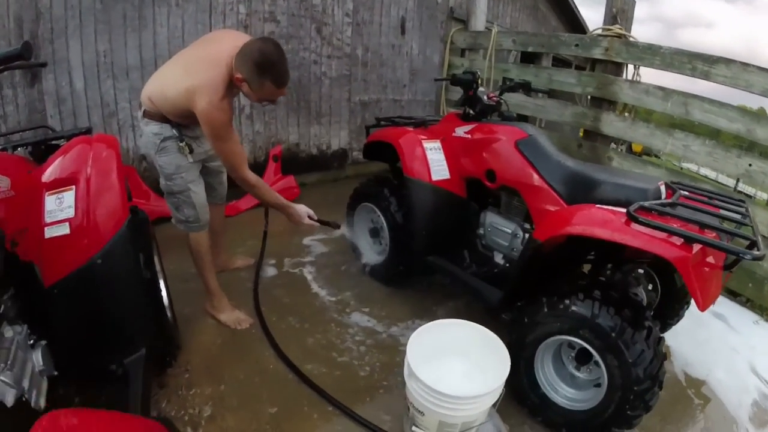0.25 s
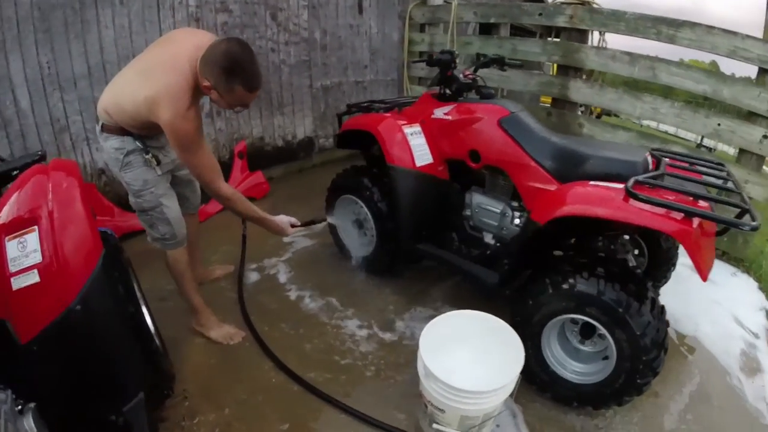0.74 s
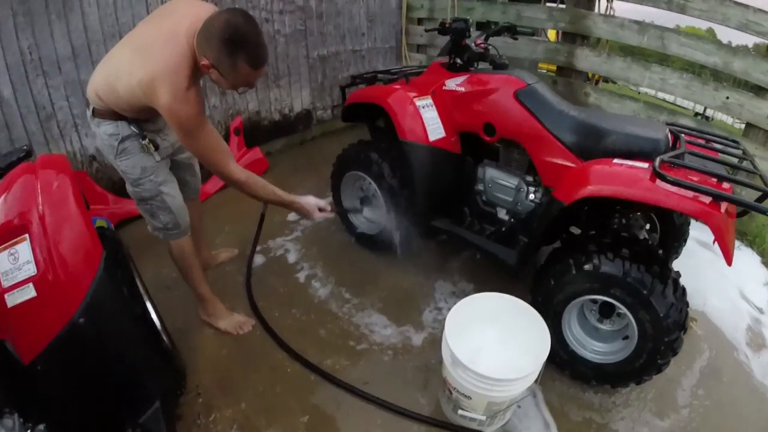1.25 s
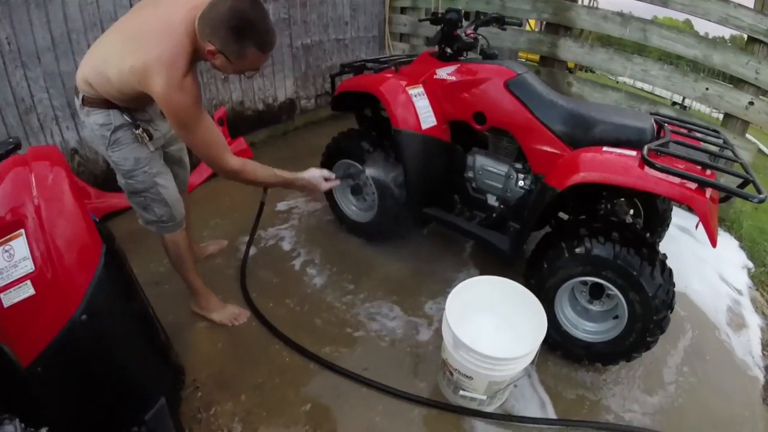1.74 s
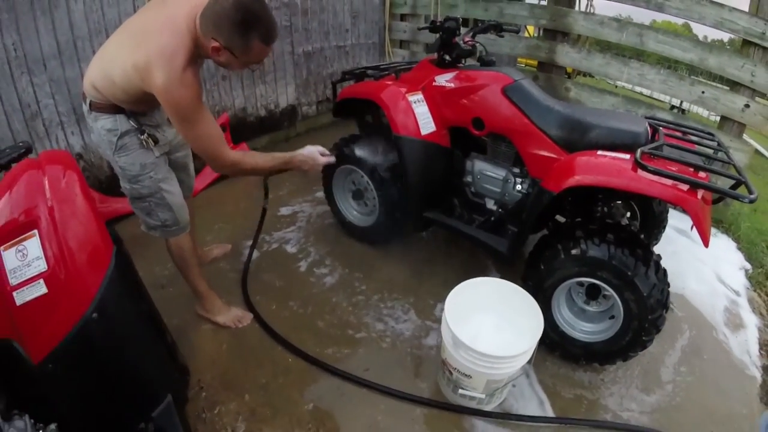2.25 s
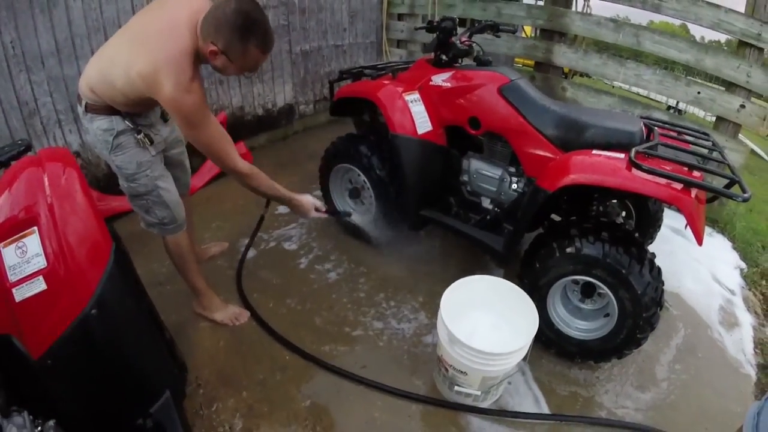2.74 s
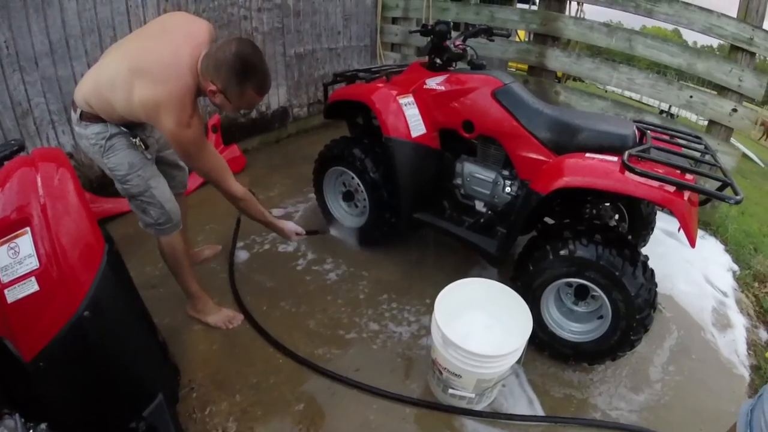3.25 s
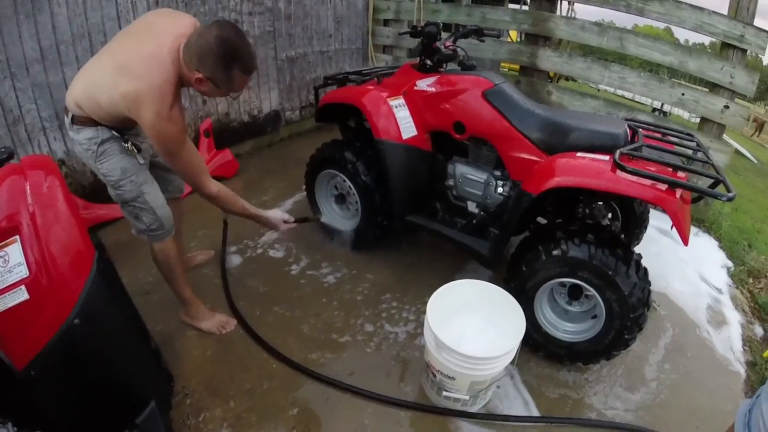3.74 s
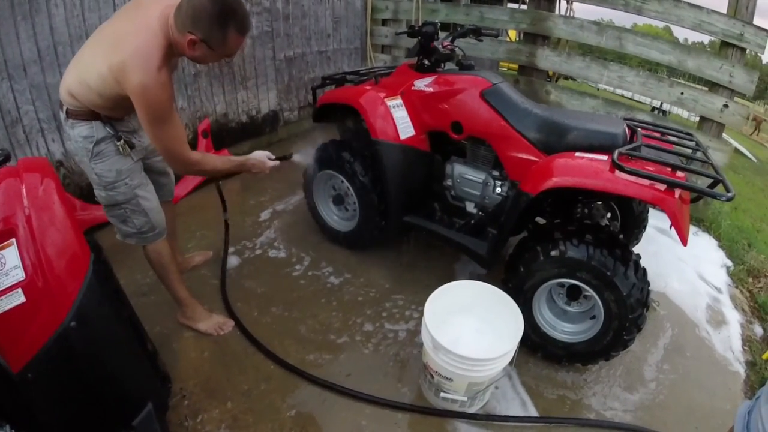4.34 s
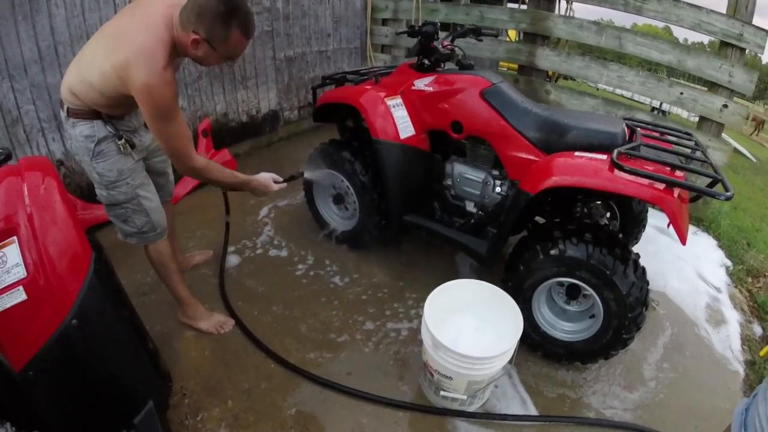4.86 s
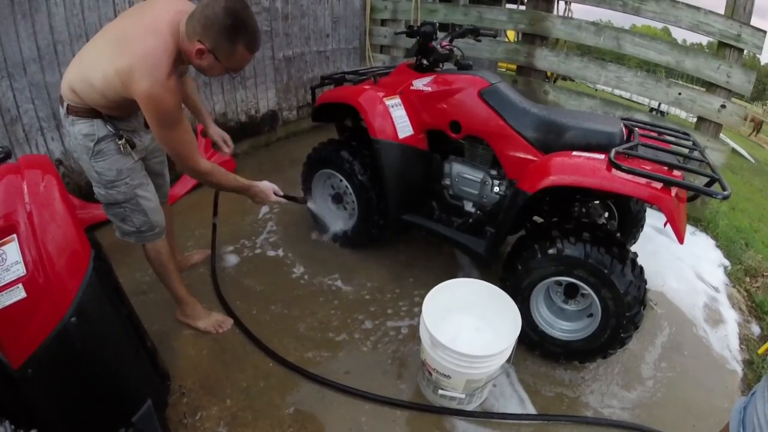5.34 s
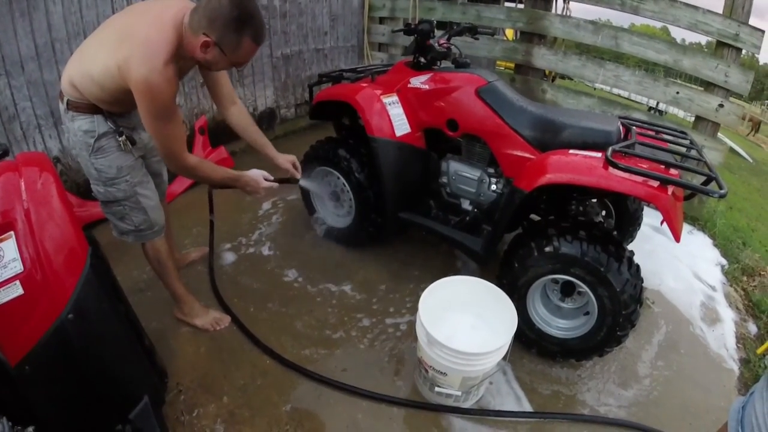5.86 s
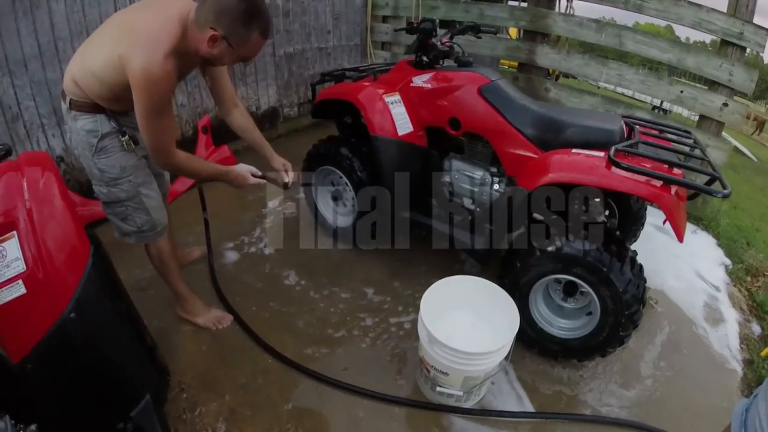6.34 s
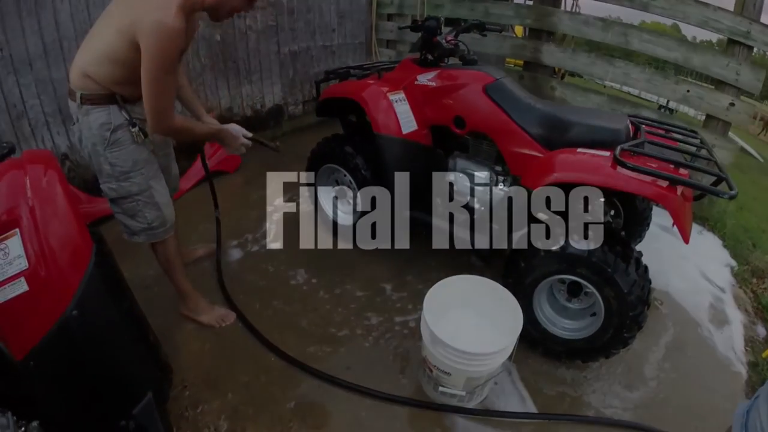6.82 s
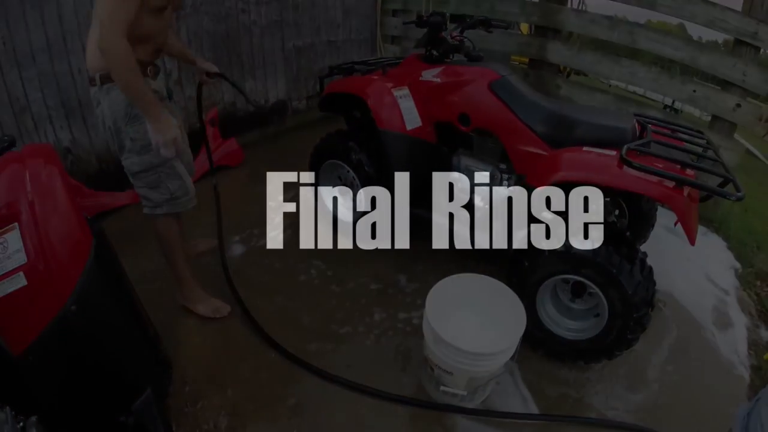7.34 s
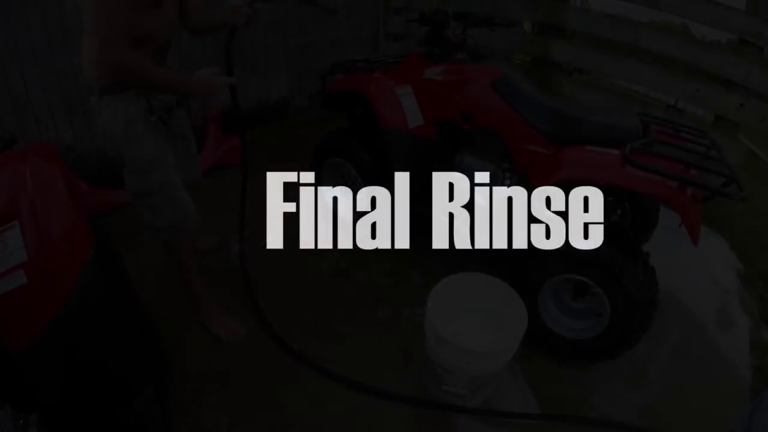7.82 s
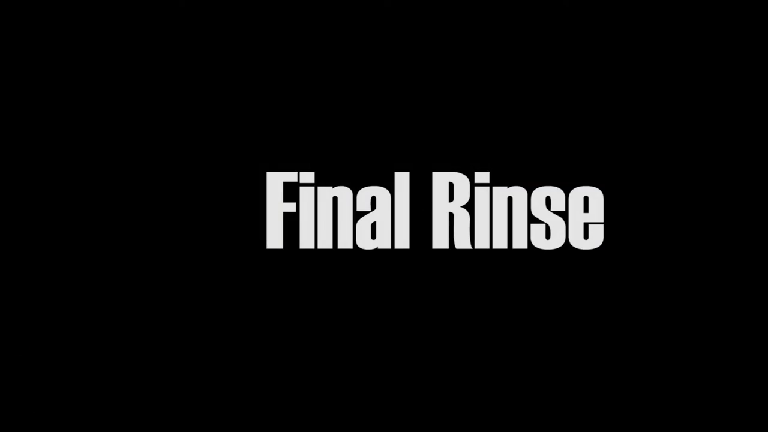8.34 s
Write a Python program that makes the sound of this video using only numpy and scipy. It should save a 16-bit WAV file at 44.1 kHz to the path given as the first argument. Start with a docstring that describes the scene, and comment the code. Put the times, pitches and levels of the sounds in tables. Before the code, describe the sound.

A strong, uneven water jet sweeps across a wheel, starting with metallic, hissing splashes on the rim, then mostly a throaty, gurgling drumming on the tyre with gushes onto a wet slab. The nozzle shuts and the spray drains in a moment. A quiet yard is left, with insects, rumble and distant engine hum; drips and ticks follow, then a bouncing clack and sudden silence. Close, centred mono pickup.

```python
"""In a yard, a garden hose plays over the wheel of a quad bike, close to one microphone.
Random impacts drum on the tyre, ring the steel rim, spatter and hiss; slugs gulp and run-off slaps the slab.
The nozzle is shut and the drumming stops at once, while the last spray drains away.
That leaves the yard: shaped-noise rumble and insects, a far engine of wavering sines, ringing drips,
short ticks, splats and knocks and a clack of the nozzle, before the sound cuts off."""
import sys
import numpy as np
from scipy import signal
from scipy.fft import rfft, irfft
from scipy.io import wavfile

SR = 44100
rng = np.random.default_rng(int(sys.argv[2]) if len(sys.argv) > 2 else 0)


def to_wav(sig):
    """Store sig (one row per channel, or 1-D mono) as 16-bit WAV at the path in sys.argv[1].

    Samples outside -1..1 are clipped; the rate is SR.
    """
    pcm = np.clip(np.atleast_2d(sig), -1, 1) * 32767
    pcm = np.round(pcm).astype(np.int16)
    wavfile.write(sys.argv[1], SR, pcm.T)  # frames by channels


N = 378378
TIME = np.arange(N) / SR
BINS = np.fft.rfftfreq(N, 1 / SR)

# the nozzle is shut; the sound has fallen to silence; the top of the band
SHUT_S, CUT_S, BAND_LIMIT_HZ = 6.292, 8.054, 15150
# once shut: the fall of the jet, then the level and fall of the water still draining
SHUT_DB_PER_S, DRAIN_DB, DRAIN_DB_PER_S = 254, -15, 100

# where the jet is aimed: t/s, share on tread and mudguard 0-1 (the rest on the wheel's face),
# force on the rubber level/dB before the common trim and the splashes
AIM = [(0, 0.14, -41.5), (.45, 0, -41), (.8, 0.5, -39), (.95, 0.6, -42), (1.27, 1, -36.5),
       (1.41, 0.2, -41.5), (1.58, 0.4, -38), (1.72, 0.9, -36.5), (1.92, 0.95, -37.5), (2.3, 0.87, -37),
       (2.65, 0.62, -35.5), (2.75, 0.1, -40), (3.14, 0.83, -43.5), (3.45, 0, -38.5), (3.68, 0.4, -40),
       (3.76, 0.9, -38), (3.8, 0.5, -41), (3.845, 0.5, -40.5), (3.868, 0.75, -35.5), (4.0, .9, -36.5),
       (4.13, 1, -36.5), (4.17, 0.8, -39), (4.28, 0.9, -39), (4.36, 0.7, -36), (4.42, 0.4, -40.5),
       (4.58, 0.25, -38), (5.15, 0.4, -38), (5.4, 0.2, -40), (5.8, 0.03, -37.5), (6.24, 0, -40.5),
       (6.31, .25, -44)]
# the jet crosses an edge of the wheel and splashes: middle t/s, length t/s,
# change of the drumming level/dB, change of the spray level/dB
SPLASHES = [(0.39, 0.067, -5, 4), (0.67, .08, 1.5, 3), (0.843, 0.12, 1.5, 0), (0.91, 0.054, 4.5, 3.5),
            (1.085, 0.071, 0.5, 1.5), (1.415, 0.12, -0.5, 3.5), (2.978, 0.36, 7, 5), (3.31, 0.26, 6.5, 3),
            (3.553, 0.12, 3.5, 4), (3.781, 0.11, 2, 6.5), (4.036, 0.064, -0.5, 1.5), (4.198, 0.098, 2, 4),
            (5.198, 0.088, -1, 6.5), (5.268, 0.12, 3, 4.5), (5.402, 0.1, 4, 4.5), (5.465, 0.072, 3, 5),
            (5.818, 0.076, -2, 4), (6.241, 0.11, 2, 3.5)]
# colour of the hollow tread under the mudguard: f/Hz, relative level/dB per Hz
TREAD_COLOUR = [(300, -38.5), (480, -23), (570, -12.5), (660, -6), (750, -9), (870, -2), (980, -6.5),
                (1100, -12), (1250, -12.5), (1450, -19), (1800, -25.5), (3000, -47)]
# colour of the wheel's face: f/Hz, relative level/dB per Hz
FACE_COLOUR = [(300, -66), (500, -11), (690, -15), (760, -9), (880, -1.5), (1020, -3.5), (1130, -7.5),
               (1300, -13), (1550, -23.5), (1900, -35), (3000, -46)]
# water sloshing in the tread: pitch, width, rms swing (octaves), speed of swing, level against the drumming
POCKET_HZ, POCKET_WIDTH_HZ, POCKET_SWING_OCT, POCKET_RATE_HZ, POCKET_DB = 823, 230, .3, 22, -6.5

# heavy slugs gulping in the hollows of the wheel: start t/s, level/dB at the crest, f/Hz at the crest
SLUGS = [(.834, -36, 853), (.957, -34.5, 871), (1.105, -36, 754), (1.191, -36, 944), (1.234, -37, 908),
         (1.458, -42, 876), (1.676, -32.5, 900), (1.83, -36.5, 847), (2.052, -41.5, 788), (2.15, -35, 804),
         (2.404, -37, 876), (2.58, -34, 950), (2.662, -34.5, 887), (2.959, -34.5, 907), (3.258, -36.5, 894),
         (3.535, -33.5, 1015), (3.862, -40.5, 892), (3.96, -36, 837), (4.057, -36.5, 886),
         (4.104, -38, 866), (4.214, -31, 850), (4.311, -33, 828), (4.461, -31.5, 917), (4.892, -36.5, 913),
         (4.963, -36, 918), (5.213, -36.5, 924), (5.265, -34.5, 1000), (5.651, -34.5, 943),
         (6.097, -36.5, 900), (6.16, -41, 905), (6.21, -38, 948)]
# what all gulps share: time to the crest, width of the pocket's resonance, upward slide
SLUG_RISE_S, SLUG_WIDTH_HZ, SLUG_GLIDE_HZ_PER_S = 0.0098, 327, 1100

# water breaking up, before splashes and pulsing: t/s, level/dB
SPRAY_LEVEL = [(0, -37), (.22, -35.5), (.41, -39), (.45, -38.5), (.5, -38.5), (.795, -40.5), (.82, -37),
               (.94, -38), (.957, -42.5), (1.03, -40), (1.25, -42.8), (1.6, -44.5), (1.9, -42.6),
               (2.58, -43.3), (2.71, -45), (2.8, -43.5), (4.4, -43), (4.9, -40), (5.15, -41.5), (5.45, -40),
               (5.7, -41), (6.3, -41)]
# colour of the spatter: f/Hz, relative level/dB per Hz
SPATTER_COLOUR = [(700, -11), (1400, 0.5), (1750, -4.5), (2050, 2.5), (2300, 1), (2550, -0.5), (2850, -4),
                  (3250, 0.5), (3750, -0.5), (4250, 3), (5250, 2), (6000, -7.5), (7000, -3.5), (10000, -26)]
# the jet on the steel rim: t/s, share in the dish 0-1, share on the lip 0-1 (the rest spatters on the tyre)
ON_RIM = [(0, 0.3, 0.16), (.2, 0.6, 0), (.41, 0.62, 0.16), (.435, 0, 0.46), (.79, 0.1, .48), (.83, 0, 0.3),
          (.94, 0, 0.5), (.96, 0, 0.07), (4.9, 0.01, 0.02), (5.25, 0.08, 0.18), (5.55, 0.1, 0.04),
          (6.4, 0.07, 0.2)]
# resonances of the dish, strongest as the jet passes each one's spot: f/Hz, width f/Hz, relative level/dB,
# t/s at that spot, reach t/s, sag of pitch away from it (Hz per s)
DISH_MODES = [(1420, 170, -3, 0.35, .14, 0.5), (1976, 370, 2.5, 0.2, 0.21, 800),
              (3120, 440, -2, .12, 0.1, -1), (2900, 360, 0.5, 0.34, .06, -0.5),
              (4330, 220, 0, 0.25, .25, 500), (4750, 300, 3, .35, .09, 400),
              (5200, 400, -7.5, .03, .15, -0.5)]
# resonances of the lip: f/Hz, width f/Hz, relative level/dB
LIP_MODES = [(2210, 250, 1), (2670, 220, -0.5), (2980, 220, -2.5), (3230, 220, 1), (4240, 250, -0.5),
             (5440, 440, -4.5)]
# colour of the mist: f/Hz, relative level/dB per Hz
MIST_COLOUR = [(3500, -22), (6000, -3), (6800, -11), (7500, -.5), (8100, 1), (8900, -7), (9500, -5.5),
               (10700, -7), (11900, -7.5), (13200, -10.5), (15000, -19)]
# level of the mist at a given spray level, and the dB it gains per dB of steady spray and of a splash
MIST_DB, MIST_AT_SPRAY_DB, MIST_PER_SPRAY, MIST_PER_SPLASH = -45, -41.5, 0.5, 0.56
# brief dips of the mist: middle t/s, length t/s, change of level/dB
MIST_DIPS = [(3.25, .8, -1), (4.435, 0.12, -5.5)]

# colour of run-off slapping wet concrete: f/Hz, relative level/dB per Hz
SLAP_COLOUR = [(90, -16), (150, -1), (200, 0), (280, 0.5), (340, 0.5), (415, 2), (460, -5.5), (510, -10),
               (700, -9.5), (1500, -14)]
# the steady run-off, before gushes and wavering: t/s, level/dB
RUNOFF_LEVEL = [(0, -45.5), (.7, -46.5), (1.45, -52.5), (3.7, -52.5), (6.3, -48)]
# pooled water spills off the wheel: middle t/s, length t/s, rise of level/dB
GUSHES = [(.41, 0.086, 5.5), (.77, 0.12, 4), (1.24, .2, 2), (1.88, 0.28, 8.5), (2.29, 0.33, 6.5),
          (2.64, .17, 11), (4.31, .14, 4.5), (5.3, 0.21, 1.5), (5.91, .16, 5)]

# single fat drops smacking the rim: t/s, level/dB, centre of the colour f/Hz, its sharpness Q, decay t/s
SPITS = [(.124, -38, 4500, .9, .004), (.492, -31.5, 3500, .9, .003), (2.862, -37.5, 5000, .9, .005),
         (4.9935, -34.5, 3200, .9, 0.0065), (5.592, -38, 3000, .9, .012)]
# short ticks, drop splats and knocks after the shut-off, with the noisy body of the clack:
# t/s, level/dB, centre of the colour f/Hz, its sharpness Q, decay t/s
KNOCKS = [(6.398, -59, 4900, 4, .008), (6.436, -58, 7800, 5, 0.004), (6.5, -51, 4500, 3, 0.004),
          (6.514, -57, 6800, 3, .005), (6.532, -57, 8000, 4, 0.003), (6.541, -56, 7500, 2, .003),
          (6.561, -48, 2500, 2.5, 0.005), (6.638, -57, 7500, 2.5, .003), (6.742, -48, 1150, 4, 0.0046),
          (7.742, -53, 4500, 1.5, 0.0044), (7.7472, -46, 5400, 3.6, 0.003), (7.7525, -50, 5500, 1.2, 0.006),
          (7.7688, -39, 1250, 1.5, 0.01), (7.769, -54, 7800, 4, .005), (7.8085, -44, 1100, 1.3, 0.0067),
          (7.8088, -49, 4700, 3, .003), (7.813, -50, 4800, 2.5, 0.0044), (7.9861, -52.5, 5500, 1.2, .005),
          (7.9868, -47, 900, 1, .006)]
# colour shared by all spits, ticks, splats and knocks: f/Hz, relative level/dB per Hz
KNOCK_COLOUR = [(150, -1), (500, 0), (950, 10), (1500, -0.5), (2400, 6), (3000, 2.5), (5000, -1.5),
                (8000, -4.5), (10000, -10.5), (14000, -12.5)]
# the nozzle clacks and bounces: t/s, peak level/dB
CLACKS = [(7.7688, -34), (7.7726, -35), (7.777, -41)]
# modes of the nozzle: f/Hz, relative level/dB, decay t/s
NOZZLE_MODES = [(480, -9, .004), (780, -4, .004), (1090, 2, 0.0054), (1550, 0, 0.005), (1950, -1, 0.006),
                (2450, 7, 0.007), (2988, -8, .003), (4323, -10, .003), (5297, -13, .002)]
# last drops ringing in the puddles: t/s, level/dB at the onset of the decay, f/Hz, decay t/s
DRIPS = [(6.501, -51, 4600, .002), (6.549, -57, 5100, .004), (6.561, -47, 2360, .005),
         (6.757, -56, 3800, .014)]

# a far engine, each level wavering: f/Hz, level/dB
ENGINE = [(56, -63.5), (84, -67.5), (117, -56.5), (166, -62.5), (236, -75), (710, -73.5), (770, -68.5),
          (829, -74.5), (888, -65), (947, -68.5), (964, -66.5), (1001, -64.5), (1055, -75), (1113, -75.5),
          (1293, -77.5)]
# colour of the patter off the wet machine: f/Hz, relative level/dB per Hz
TICK_COLOUR = [(500, -27), (1000, 0), (1800, -10.5), (3000, 7), (4800, -1), (6200, -6.5), (8000, 2.5),
               (10000, -13), (14000, -28.5)]
# the insect chorus, before its wavering: t/s, level/dB
CHORUS_LEVEL = [(0, -62), (6.35, -61), (6.8, -57.5), (7.2, -57.5), (7.6, -57), (8.05, -55.5)]
# colour of the insects: f/Hz, relative level/dB per Hz
INSECT_COLOUR = [(1500, -32), (1980, -10.5), (2200, -2.5), (2480, -7), (2720, -5.5), (3000, 0),
                 (3300, -1.5), (3600, -10), (4100, -14.5), (5000, -17), (6200, -21.5), (7100, -18.5),
                 (8200, -26.5), (13000, -32.5)]
# narrow, fuzzy tones within the chorus: f/Hz, width f/Hz, level/dB
DRONE = [(2090, 20, -72), (2220, 25, -74), (2420, 30, -74), (3000, 24, -69), (3150, 41, -69),
         (3400, 19, -71.5)]
# colour of the outdoor rumble: f/Hz, relative level/dB per Hz
YARD_COLOUR = [(20, -11.5), (45, -6.5), (57, -4), (70, -6), (88, -0.5), (135, -5), (170, -6.5), (215, -9),
               (420, -19), (600, -17.5), (950, -11), (1200, -17.5), (1800, -24.5), (2600, -42)]


def hose():
    """One uneven jet drives all the water; shutting it stops the drumming while the spray drains away slower."""
    pulsing = wander(26)
    since_shut = np.maximum(TIME - SHUT_S, 0)
    jet = from_db(-SHUT_DB_PER_S * since_shut)
    draining = np.maximum(jet, from_db(DRAIN_DB - DRAIN_DB_PER_S * since_shut))
    return jet * (tyre(pulsing) + slugs()) + draining * (spray(pulsing) + runoff())


def tyre(pulsing):
    """The jet drums and bubbles on rubber; the tread gurgles and sounds deeper than the wheel's face."""
    blows = impacts(per_s=2500, spread_db=1.5, wash=0.99)
    blows = blows * from_db(0.35 * pulsing + 0.34 * wander(45))
    on_tread = np.clip(curve(AIM), 0, 1)
    tread = on_tread * coloured(blows, TREAD_COLOUR)
    face = (1 - on_tread) * coloured(blows, FACE_COLOUR)
    body = unit(tread + face)
    pocket_hz = POCKET_HZ * 2 ** (POCKET_SWING_OCT * wander(POCKET_RATE_HZ))
    pocket = resonate(blows, pocket_hz, POCKET_WIDTH_HZ)
    body = unit(body + from_db(POCKET_DB) * on_tread * pocket)
    bubbles = crackle(per_s=260, low_hz=649, high_hz=1136, cycles=5.5, count=14)
    body = unit(body + from_db(-8.0) * bubbles)
    splash_db = swells((s, length, db) for s, length, db, _ in SPLASHES)
    level = from_db(curve(AIM, axis=2) + splash_db + 0.57)
    return scattered(body, near_db=-34.5, far_db=-8.5, change_hz=2.26) * level


def slugs():
    """Each slug churns in a pocket of the wheel: a short hollow gulp that rises as the pocket fills."""
    age, out = np.arange(SR // 8) / SR, np.zeros(N)
    envelope = age / SLUG_RISE_S * np.exp(1 - age / SLUG_RISE_S)
    envelope_rms = np.sqrt(np.mean(envelope ** 2))
    pocket = signal.butter(2, SLUG_WIDTH_HZ / 2, fs=SR)
    for s, db, hz in SLUGS:
        noise = rng.standard_normal(len(age)) + 1j * rng.standard_normal(len(age))
        churn = signal.lfilter(*pocket, noise)
        turns = np.cumsum(hz + SLUG_GLIDE_HZ_PER_S * (age - SLUG_RISE_S)) / SR
        tone = (churn * np.exp(2j * np.pi * turns)).real  # the slow churn lifted to the gliding pitch
        add(out, s, from_db(db) * envelope_rms * unit(envelope * tone))
    return out


def spray(pulsing):
    """The jet shatters into crackling spatter, rings the rim where it meets it, and throws off hissing mist."""
    drops = impacts(per_s=5000, spread_db=1.0, wash=1.6)
    spatter = scattered(coloured(drops, SPATTER_COLOUR), near_db=-15.5, far_db=-10, change_hz=3.9)
    in_dish = np.clip(curve(ON_RIM), 0, 1)
    on_lip = np.clip(curve(ON_RIM, axis=2), 0, 1)
    on_tyre = np.clip(1 - in_dish - on_lip, 0, 1)
    # shares are of power, hence the roots
    splash = np.sqrt(on_tyre) * spatter + np.sqrt(in_dish) * dish() + np.sqrt(on_lip) * ringing(LIP_MODES)
    pops = crackle(per_s=420, low_hz=2140, high_hz=5530, cycles=2.1, count=12)
    splash = unit(splash + from_db(-10.0) * pops)
    droplets = impacts(per_s=7000, spread_db=3.0, wash=0.85)
    mist = scattered(coloured(droplets, MIST_COLOUR), near_db=-16.5, far_db=-11.5, change_hz=7.9)
    steady_db = curve(SPRAY_LEVEL)
    splash_db = swells((s, length, db) for s, length, _, db in SPLASHES)
    mist_db = MIST_DB + MIST_PER_SPRAY * (steady_db - MIST_AT_SPRAY_DB)
    mist_db = mist_db + MIST_PER_SPLASH * splash_db + swells(MIST_DIPS)
    splash = splash * from_db(steady_db + splash_db + 0.68 * pulsing)
    return splash + mist * from_db(mist_db + 0.55 * pulsing)


def dish():
    """As the jet sweeps the dished rim, each resonance swells and fades; some rise in pitch, then sink."""
    drops = impacts(per_s=2800, spread_db=5.0, wash=0.91)
    out, power = np.zeros(N), np.zeros(N)
    for hz, width, db, s, reach, sag in DISH_MODES:
        away = np.minimum(abs(TIME - s), 1)
        gain = from_db(db) / (1 + (away / reach) ** 4)
        out += gain * resonate(drops, hz - sag * away, width)
        power += gain ** 2
    return out / np.sqrt(power)  # steady level, changing blend


def ringing(modes):
    """Fine drops excite each resonance of a steel part, heard as peaks in their spectrum."""
    drops = rfft(impacts(per_s=3800, spread_db=0.5, wash=1.03))
    power = sum(from_db(db) ** 2 / (1 + (2 * (BINS - hz) / width) ** 2) ** 2 for hz, width, db in modes)
    return unit(irfft(drops * np.sqrt(power), N))


def runoff():
    """Heavy drops fall from the wheel on to wet concrete, now and then in a gush."""
    drops = coloured(impacts(per_s=440, spread_db=1.0, wash=0.65), SLAP_COLOUR)
    return drops * from_db(curve(RUNOFF_LEVEL) + swells(GUSHES) + 0.9 * wander(15))


def knocks(rows):
    """Each row is a sharp click and a short noisy rattle, from a thin tick or splat to a hollow knock."""
    ring = coloured(signal.unit_impulse(N), KNOCK_COLOUR)[:256]
    age, out = np.arange(SR // 10) / SR, np.zeros(N)
    for s, db, hz, q, decay in rows:
        rattle = np.exp(-age / decay) * rng.standard_normal(len(age))
        click = 3 * (age == 0)
        colour = signal.iirpeak(min(hz, SR / 4), Q=max(q, .5), fs=SR)
        sound = signal.lfilter(*colour, np.convolve(rattle + click, ring))
        # energy of a noise burst with this decay
        sound = sound * np.sqrt(decay * SR / 2) / np.linalg.norm(sound)
        add(out, s, from_db(db) * sound)
    return out


def clacks():
    """A hard blow and its bounces ring the short modes of the nozzle."""
    age, out = np.arange(SR // 20) / SR, np.zeros(N)
    ring = sum(from_db(db) * np.exp(-age / decay) * np.sin(2 * np.pi * hz * age)
               for hz, db, decay in NOZZLE_MODES)
    for s, db in CLACKS:
        add(out, s, from_db(db) * ring / abs(ring).max())
    return out


def drips():
    """Each drop traps a small bubble that rings briefly as a decaying sine."""
    out = np.zeros(N)
    for s, db, hz, decay in DRIPS:
        age = np.maximum(TIME - s, 0)
        out += from_db(db) * np.exp(-age / decay) * np.sin(2 * np.pi * hz * age)
    return out


def yard():
    """Behind everything: a far engine, insects, the wet machine dripping, and outdoor rumble."""
    patter = coloured(impacts(per_s=67, spread_db=3.0, wash=.1), TICK_COLOUR) * from_db(-76.0)
    return engine() + insects() + drone() + patter + rumble()


def engine():
    """A far engine is a set of sines sharing one wavering speed, each wavering in level on its own."""
    clock = np.cumsum(1 + 0.00398 * wander(4.7)) / SR
    return sum(np.sqrt(2) * from_db(db + 2.5 * wander(10.0)) * np.sin(2 * np.pi * hz * clock)
               for hz, db in ENGINE)


def insects():
    """Many insects blur into coloured noise that flutters and slowly sways."""
    chorus = coloured(rng.standard_normal(N), INSECT_COLOUR)
    return chorus * from_db(curve(CHORUS_LEVEL) + .5 * wander(30) + .5 * wander(4))


def drone():
    """Faint, fuzzy tones hang in the distance: noise through very narrow resonances."""
    hiss = rfft(rng.standard_normal(N))
    return sum(from_db(db) * unit(irfft(hiss / (1 + 2j * (BINS - hz) / width) ** 2, N))
               for hz, width, db in DRONE)


def rumble():
    """Outdoor rumble is coloured noise, barely wavering in level."""
    return coloured(rng.standard_normal(N), YARD_COLOUR) * from_db(-49.5 + .3 * wander(9.5))


def impacts(per_s, spread_db, wash):
    """Drops of uneven size land at random, over a wash of those too small to tell apart."""
    size = from_db(spread_db * np.minimum(rng.exponential(1, N), 4))
    drops = size * rng.choice([-1, 1], N) * (rng.random(N) < per_s / SR)
    return unit(unit(drops) + wash * rng.standard_normal(N))


def crackle(per_s, low_hz, high_hz, cycles, count):
    """Larger drops and bubbles pop one by one, on a ladder of count pitches, each dying over a few cycles."""
    age, out = np.arange(SR // 100) / SR, np.zeros(N)
    for hz in np.geomspace(low_hz, high_hz, count):
        pop = np.exp(-age * hz / cycles) * np.sin(2 * np.pi * hz * age)
        hits = impacts(per_s=per_s / count, spread_db=3.0, wash=0)
        out += unit(signal.oaconvolve(hits, pop)[:N])
    return unit(out)


def scattered(x, near_db, far_db, change_hz):
    """Wheel, slab and shed wall throw the sound back as short noise tails whose blend drifts at random."""
    age = np.arange(SR // 20) / SR
    near, far = np.exp(-age / 0.0018), np.exp(-age / 0.014)
    envelope = from_db(near_db) * near / np.linalg.norm(near) + from_db(far_db) * far / np.linalg.norm(far)
    envelope = envelope * (age > .0004)  # a gap after the direct sound
    weights = np.array([wander(change_hz) for _ in range(6)])
    weights /= np.linalg.norm(weights, axis=0)
    echoes = sum(w * signal.oaconvolve(x, envelope * rng.standard_normal(len(age)))[:N] for w in weights)
    return unit(x + echoes) * np.std(x)


def resonate(x, hz, width):
    """A resonance follows the curve hz: x is turned down to zero pitch, smoothed and turned back; rms 1."""
    turn = np.exp(2j * np.pi * np.cumsum(hz) / SR)
    r = np.exp(-np.pi * width / SR)
    smoothed = signal.lfilter([1], [1, -2 * r, r * r], x / turn)
    return unit((turn * smoothed).real)


def coloured(x, spectrum):
    """Gives x a spectrum at rms 1, with minimum phase so that each impact rings after it lands."""
    hz, db = np.transpose(spectrum)
    gain_db = np.interp(np.log(BINS + 1), np.log(hz), db, db.min() - 10.5, db.min() - 16.5)
    cepstrum = irfft(np.log(from_db(gain_db)), N)
    cepstrum[1:N // 2] *= 2  # folding the cepstrum makes the phase minimal
    cepstrum[N // 2 + 1:] = 0
    return unit(irfft(rfft(x) * np.exp(rfft(cepstrum)), N))


def wander(rate_hz):
    """Smooth random drift with an rms of 1, mostly slower than the rate."""
    return unit(irfft(rfft(rng.standard_normal(N)) / (1 + (BINS / rate_hz) ** 4), N))


def swells(rows):
    """Smooth rises or dips in dB that return to zero, from rows of middle t/s, length t/s, level/dB."""
    return sum(db * np.cos(np.pi * np.clip((TIME - s) / length, -.5, .5)) ** 2 for s, length, db in rows)


def curve(rows, axis=1):
    """One column of a table, joined by straight lines in time."""
    columns = np.transpose(rows)
    return np.interp(TIME, columns[0], columns[axis])


def add(mix, s, sound):
    """Lays a sound into the mix at a time in seconds."""
    part = mix[round(s * SR):][:len(sound)]
    part += sound[:len(part)]


def from_db(db):
    """Decibels to gain."""
    return 10 ** (np.asarray(db) / 20)


def unit(x):
    """Scales to an rms of 1."""
    return x / np.sqrt(np.mean(x ** 2) + 1e-20)


def scene():
    """Everything reaches one microphone, the same on both channels."""
    mono = hose() + knocks(SPITS) + knocks(KNOCKS) + clacks() + drips() + yard()
    return np.array([mono, mono])


def record(dry):
    """The sound drops to silence within 2 ms near the end; then the treble is band-limited."""
    running = np.clip((CUT_S - TIME) / .002, 0, 1)
    low_pass = signal.firwin(511, BAND_LIMIT_HZ, window=("kaiser", 9), fs=SR)
    return signal.oaconvolve(dry * running, low_pass[None], "same")


dry = scene()
out = record(dry)
to_wav(out)
```